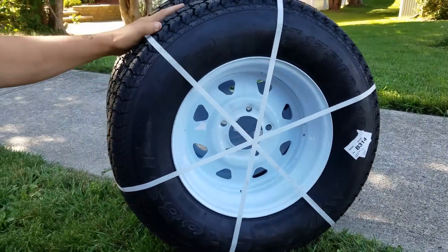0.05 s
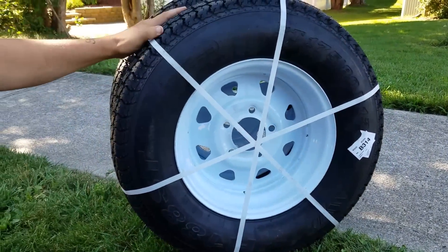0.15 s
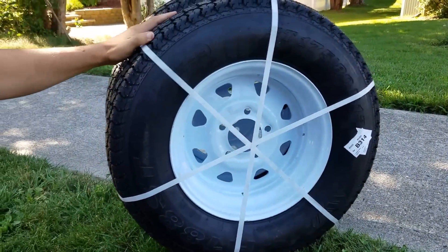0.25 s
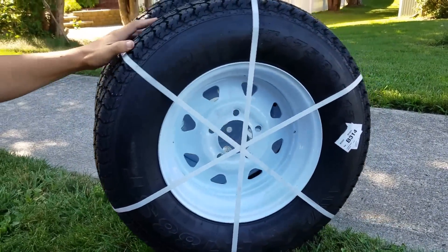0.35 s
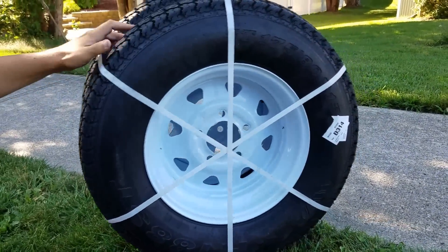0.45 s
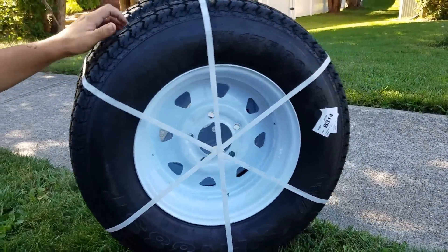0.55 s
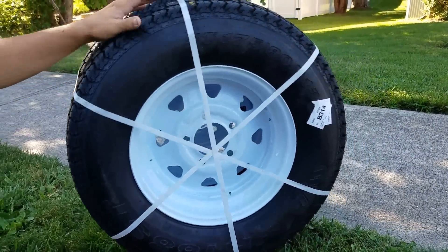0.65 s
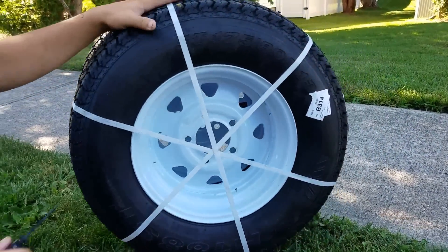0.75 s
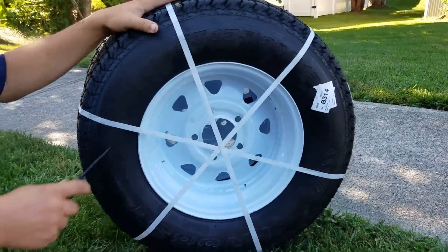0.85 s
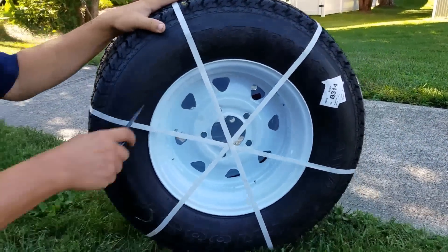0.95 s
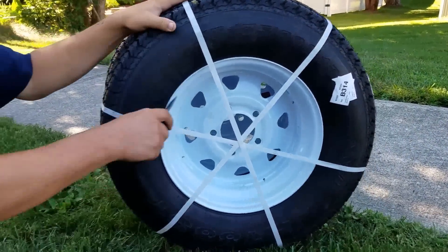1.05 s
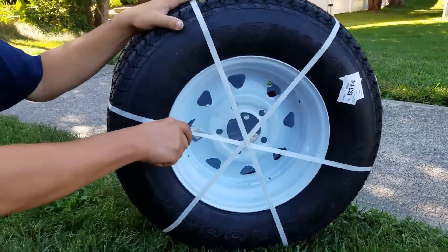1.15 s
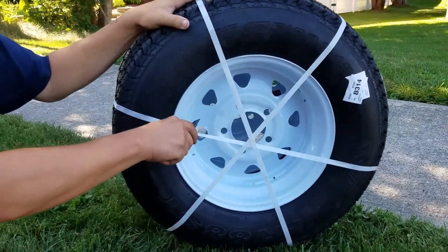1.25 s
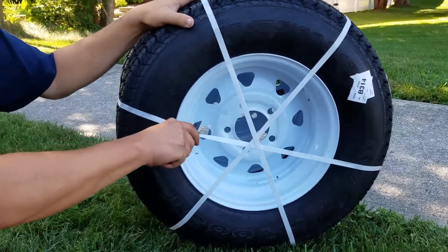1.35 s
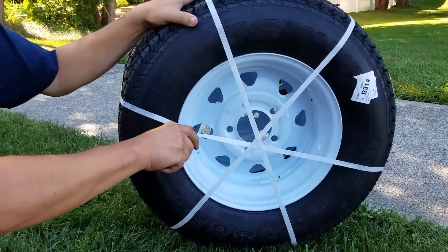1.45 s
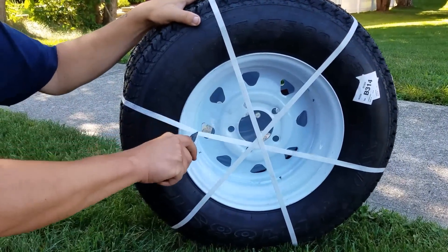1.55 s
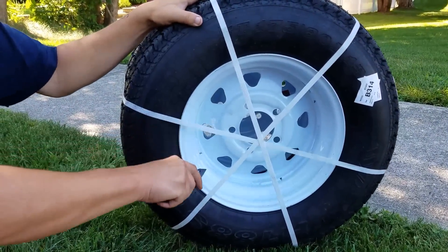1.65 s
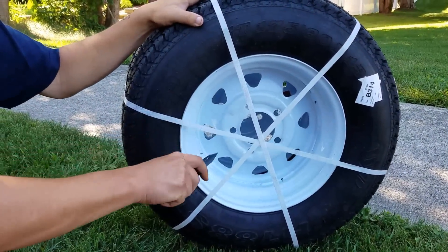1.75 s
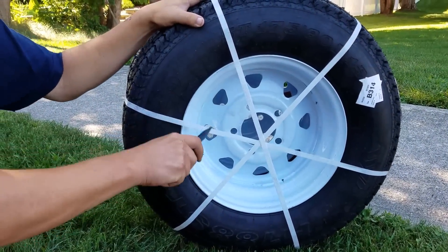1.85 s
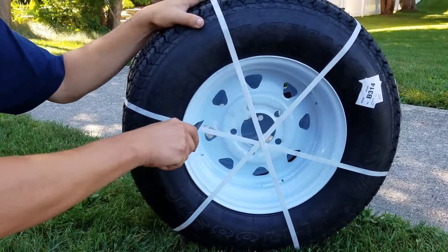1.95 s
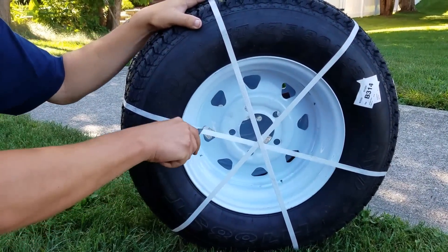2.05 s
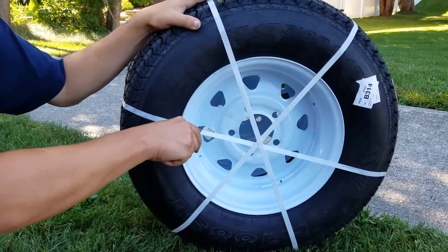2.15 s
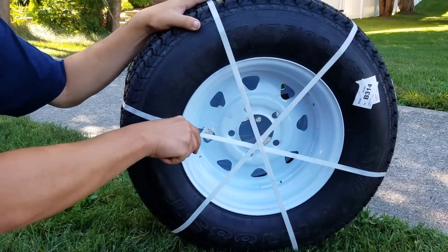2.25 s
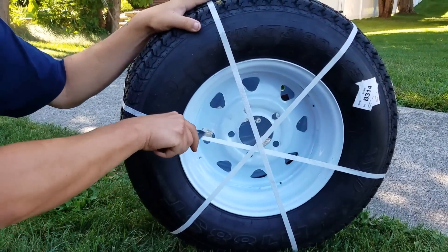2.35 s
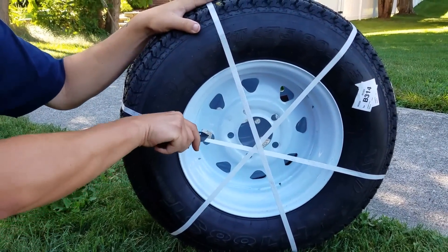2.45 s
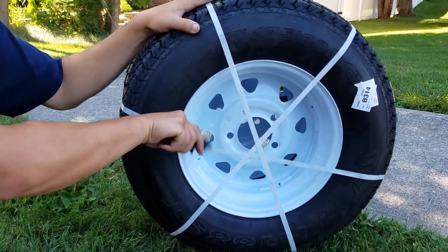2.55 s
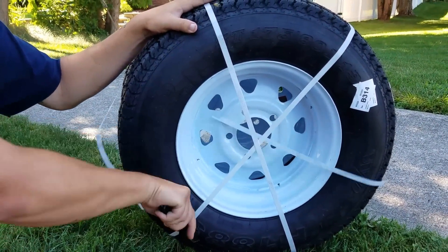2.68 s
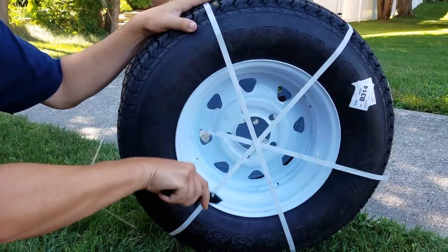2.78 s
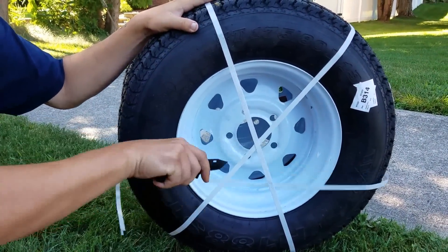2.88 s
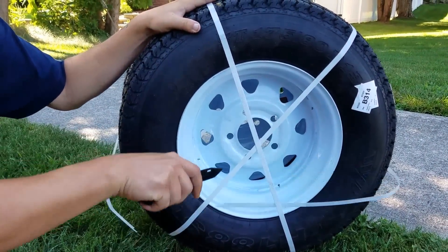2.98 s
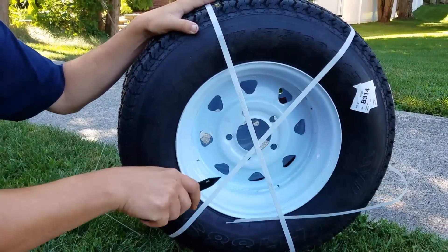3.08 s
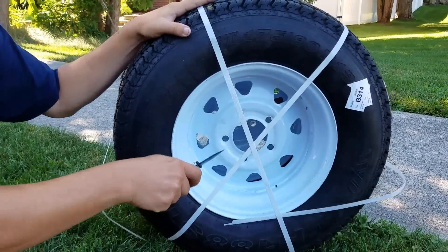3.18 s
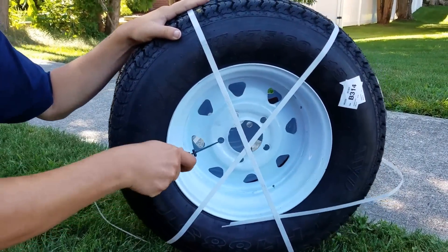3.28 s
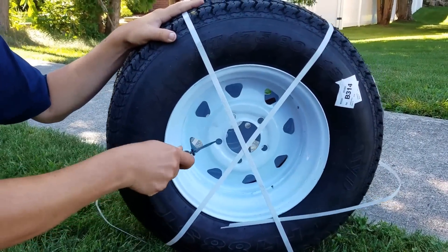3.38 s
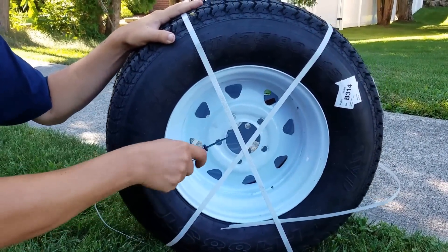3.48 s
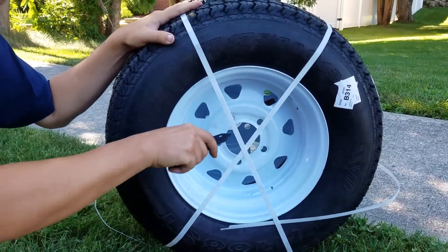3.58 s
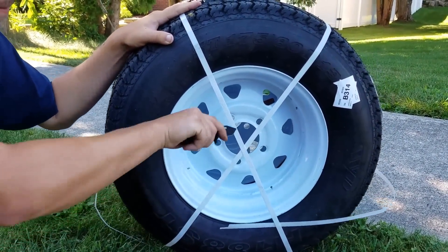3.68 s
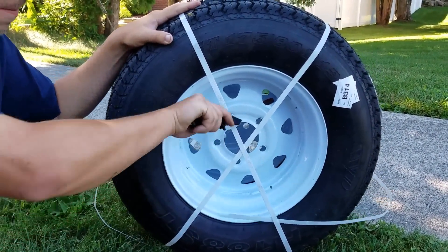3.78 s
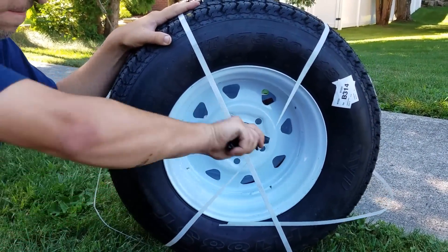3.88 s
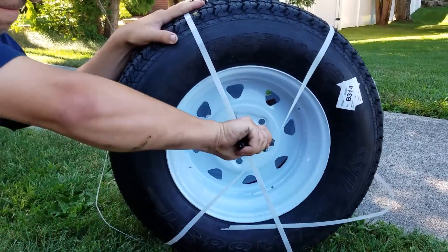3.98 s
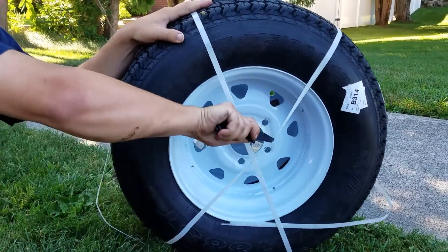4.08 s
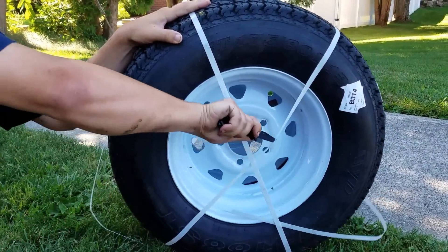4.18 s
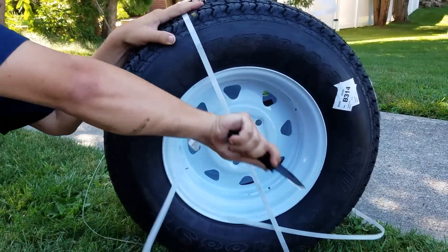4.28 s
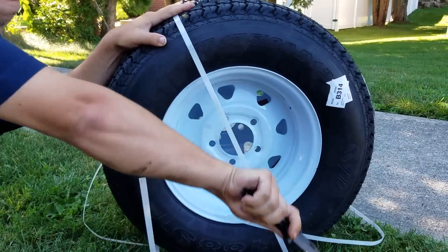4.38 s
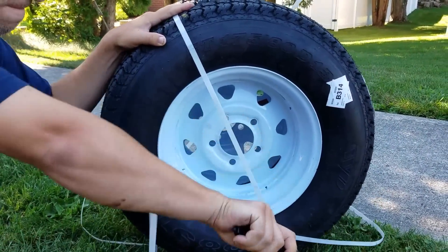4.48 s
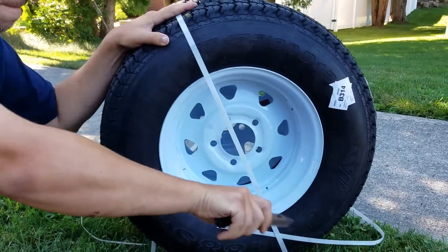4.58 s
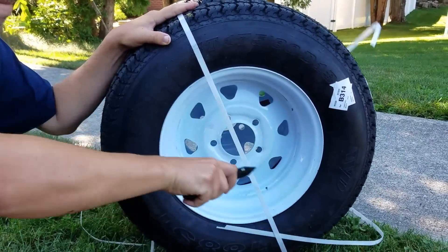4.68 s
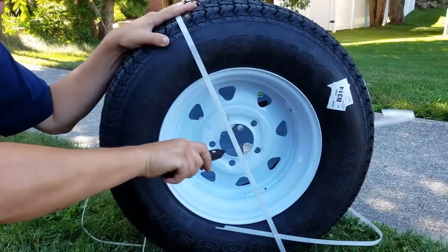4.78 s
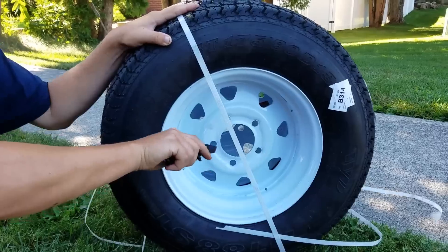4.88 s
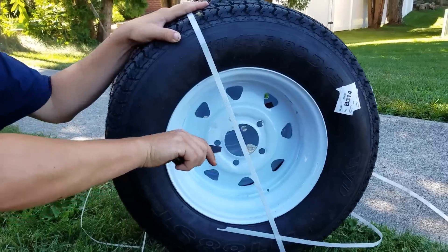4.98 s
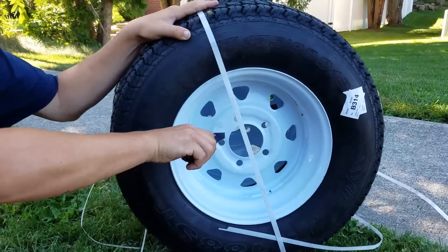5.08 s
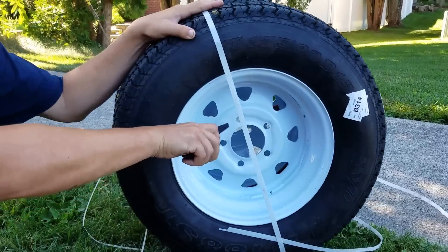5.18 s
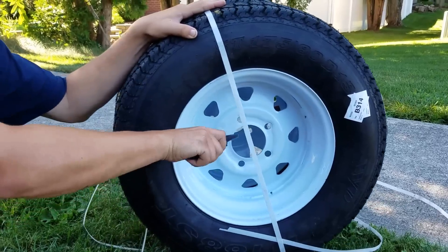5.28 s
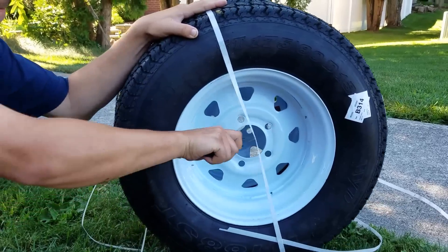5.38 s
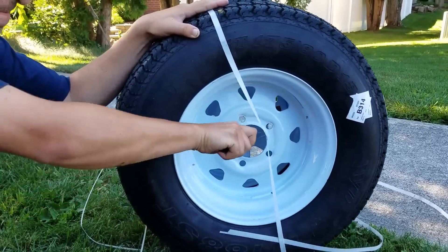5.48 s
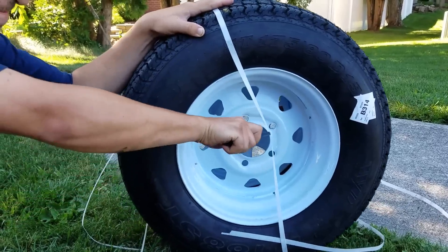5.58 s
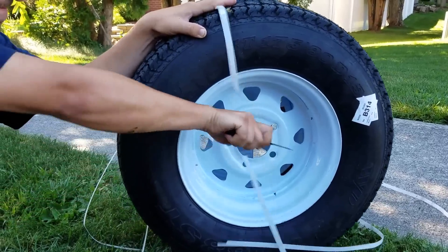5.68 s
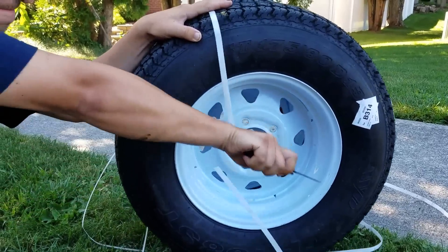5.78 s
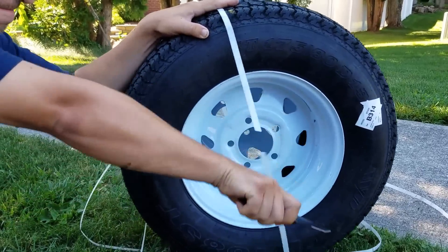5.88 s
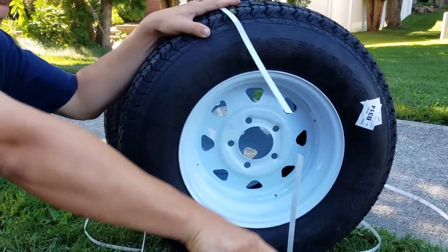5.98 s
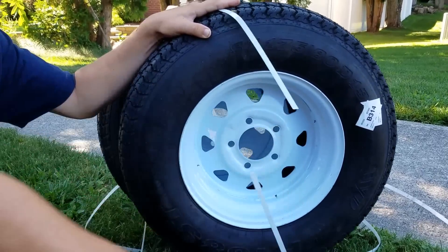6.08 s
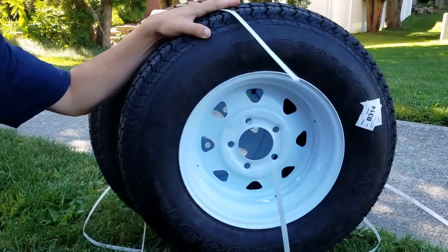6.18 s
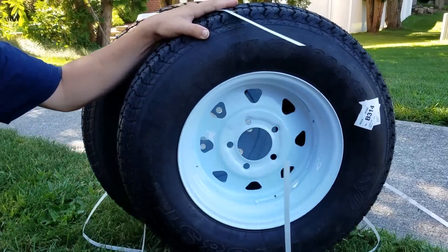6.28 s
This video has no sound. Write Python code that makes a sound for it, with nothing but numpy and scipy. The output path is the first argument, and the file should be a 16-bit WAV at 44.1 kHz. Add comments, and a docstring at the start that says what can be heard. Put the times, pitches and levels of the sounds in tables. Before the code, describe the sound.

Sharp snaps of cut plastic strapping with hollow rubber thumps and brief rim rings, between faint blade ticks and scrapes outdoors.

```python
"""On a lawn, a knife cuts taut plastic packing straps on a trailer wheel: each cut cracks and a tyre mode booms.
Freed ends whip onto the rubber and the steel rim: shaped noise bursts with a twang, plus decaying modes.
Plastic snaps, blade ticks and scrapes are shorter or softer grains of noise, with a weak diffuse echo.
A far engine of two harmonics and faint coloured noise lie underneath; very loud cracks pull the level down
for a moment."""
import sys
import numpy as np
from scipy import signal
from scipy.fft import rfft, irfft, next_fast_len
from scipy.io import wavfile
from scipy.ndimage import uniform_filter1d, minimum_filter1d, map_coordinates

SR = 44100
rng = np.random.default_rng(int(sys.argv[2]) if len(sys.argv) > 2 else 0)


def wav_record(signal):
    """Record a signal, one row per channel, as 16-bit PCM in the file named by sys.argv[1]."""
    frames = np.transpose(np.atleast_2d(signal))
    bounded = np.clip(frames, -1, 1)
    # unit amplitude maps onto the largest positive 16-bit level
    quanta = np.round(bounded * 32767).astype(np.int16)
    wavfile.write(sys.argv[1], SR, quanta)


N = 279726
T = np.arange(SR // 2) / SR  # time inside one event, s
TOP_HZ = 14800  # upper band limit

# knife cuts in a taut strap: [t/s, knock level/dB, tear level/dB, strap resonance f/Hz, nominal t60/s]
CUTS = [(1.194, -46.5, -54.5, 790, 0.073), (1.4228, -25, -43, 673, 0.05), (1.582, -24, -32.5, 751, .11),
        (2.6193, -19, -27, 927, 0.09), (2.636, -23.5, -29.5, 804, 0.062), (3.909, -31, -37.5, 848, .135),
        (4.2574, -29, -34.5, 558, .07), (4.2869, -26.5, -40, 1400, 0.039), (5.683, -17, -27.5, 891, 0.068)]
# freed ends landing on the wheel: [t/s, slither duration/s, strap level/dB, splinter level/dB, strap f/Hz,
# nominal t60/s, tyre level/dB, favoured tyre f/Hz, rim level/dB, favoured rim f/Hz]
WHIPS = [(1.6381, .005, -26, -26.5, 528, .15, -24, 208, -44, 1500),
         (2.689, .009, -27.5, -31.5, 870, 0.13, -28.5, 440, -59, 1200),
         (4.3115, .002, -19, -43, 1144, .095, -15.5, 260, -36.5, 2127),
         (5.7326, .009, -9.3, -24.5, 990, 0.061, -15.5, 270, -25, 1040)]
# modes of tyre and wheel disc: [f/Hz, relative level/dB, t60/s]
TYRE_MODES = [(95, -9.5, 0.24), (181.3, -3, .18), (208.5, -1, 0.22), (332.5, 1, 0.14), (387, -9, 0.24),
              (451.6, 0, 0.17), (580, 1.5, 0.046), (673, 2, 0.25)]
# modes of the steel rim: [f/Hz, relative level/dB, t60/s]
RIM_MODES = [(1021, 13, 0.066), (1230, 3, 0.052), (1403, 7, 0.13), (1440, -14.5, 0.5), (1501, -10, 0.15),
             (1557, -2, .18), (1960, -2.5, 0.21), (2054, 0.5, 0.14), (2185, 2, 0.21), (2220, -2, .26),
             (2290, -1, 0.28), (2540, -8, 0.36), (2720, -14.5, 0.6), (2880, -11, 0.7), (3134, -16, 0.45),
             (3164, -16.5, 0.3)]
# snaps of brittle plastic: [t/s, level/dB, left-right level difference/dB]
SNAPS = [(1.638, -16.5, -8), (2.121, -51, -1), (2.192, -46, 0), (2.426, -42, 0), (2.6233, -14, -2),
         (2.688, -23.5, -6), (2.728, -27.5, -5), (2.852, -39, -1), (4.26, -18.5, -3.5), (4.2875, -11.5, -3),
         (4.3101, -2, -4), (5.7336, -9.5, 0)]
# light ticks of the blade on steel: [t/s, level/dB]
TICKS = [(2.971, -47.5), (4.016, -53), (4.9396, -35), (4.9452, -27.5), (4.956, -40), (4.983, -36),
         (5.046, -47), (5.067, -45.5), (5.429, -44), (5.778, -30.5)]
# sliding of blade, straps and hand: [t/s of the peak, half length/s, body level/dB, hiss level/dB]
SCRAPES = [(.03, .05, -57.5, -68), (.768, 0.048, -52, -54), (2.173, 0.047, -54.5, -71),
           (2.197, .009, -43.5, -54.5), (2.443, 0.015, -41, -51.5), (2.571, .008, -40.5, -64),
           (2.86, 0.016, -51, -61), (3.048, 0.19, -66, -71), (4.086, .045, -49, -57.5),
           (5.445, .02, -49, -62), (5.528, 0.0034, -56, -64), (6.297, 0.0077, -47, -65)]
# spectrum of a tearing strap: [f/Hz, relative spectral level/dB]
STRAP_COLOUR = [(41, -45.5), (70, -18), (198, -6), (272, -9), (457, -1), (585, -2.5), (670, -0.5),
                (1380, 1.5), (1690, -5.5), (2660, -4.5), (3570, -17), (7190, -23), (12600, -14),
                (14500, -13.5), (15500, -38.5)]
# spectrum of snapping plastic: [f/Hz, relative spectral level/dB]
SNAP_COLOUR = [(300, -10), (700, -4), (1150, -1), (2100, -7), (3100, -8), (4200, -21), (5200, -14),
               (7500, -17), (9200, -2), (10800, -8.5), (12600, 3), (14500, 1.5)]
# stereo balance of the near sources: [f/Hz, left-right level difference/dB]
NEAR_PAN = [(200, -1.5), (700, -2.5), (1200, -5), (2200, -10.5), (3200, -11), (4500, -3.5), (6500, 6),
            (9000, -5.5), (14000, 2.5)]
# stereo likeness of the near sources: [f/Hz, left-right correlation]
NEAR_ALIKE = [(300, 0.98), (1000, .94), (2500, 0.13), (4500, 0.19), (12000, 0.04)]
# decay of the answer from the yard: [f/Hz, t60/s]
YARD_DECAY = [(150, .34), (700, 0.3), (2500, 0.28), (6000, 0.38), (13000, 0.16)]
# far engine: [t/s, mean pitch f/Hz, level/dB]
ENGINE = [(0, 100.3, -73), (.6, 96.5, -56.5), (1.9, 88.3, -61), (2.5, 60.2, -63.5), (4.1, 64.4, -57),
          (4.5, 65.7, -67.5), (6.34, 66, -77)]
# spectrum of the open air: [f/Hz, relative spectral level/dB]
AIR_COLOUR = [(15, -44.5), (25, -29), (27, -22), (45, -16.5), (98, 1), (250, -8), (373, -13.5), (415, -16),
              (515, -20.5), (2130, -28), (5720, -45.5), (7680, -37.5), (10000, -47.5), (13800, -38),
              (15000, -47.5)]
# stereo balance of the air: [f/Hz, left-right level difference/dB]
AIR_PAN = [(60, -5.5), (150, -2.5), (380, -2.0), (950, -3), (2380, -6), (5980, 2), (15000, 0)]
# stereo likeness of the air: [f/Hz, left-right correlation]
AIR_ALIKE = [(60, 0.97), (180, 0.99), (550, 0.35), (1650, -0.16), (4970, -0.14), (15000, 0.0055)]
# slow swell of the air: [t/s, rumble level/dB, hush level/dB]
AIR_LEVEL = [(0, -55.5, -58.5), (.8, -55, -57.5), (2.7, -54, -58), (3.3, -54.5, -59), (6.34, -54, -57.5)]

RISE_SHARE = 0.045  # rise time of a cut over its t60
THUD_DB, BOOM_DB = -0.5, -3.5  # thud and tyre boom relative to the tear
BOOM_HZ, BOOM_LAG_S = 282, .005  # tyre pitch that a cut favours, and its delay
SLITHER_DB, SLITHER_HISS_DB, SLITHER_HZ, SLITHER_T60_S = -28, -29, 1830, 0.04  # sliding in before landing
WHIP_THUD_DB = -8  # relative to the tyre boom
# loose ends land again after a whip
PATTER_DB, PATTER_FROM_S, PATTER_SPAN_S, PATTER_FALL_DB_PER_S = -31, .03, 0.039, 80
SNAP_HZ, SNAP_BODY_DB = 1450, -8  # pitch of a snap; its body relative to its edge
TICK_HZ, TICK_EDGE_DB = 3700, -2.5  # pitch of a tick; its edge relative to its body
ROUGH_DB, CATCHES_PER_S = 1.75, 100  # how unevenly sliding plastic catches
# level dip: onset, dB of cut per dB above it, deepest cut
DIP_THRESHOLD_DB, DIP_SLOPE, DIP_MOST_DB = -13.5, 3, 5.5
DIP_ATTACK_S, DIP_HOLD_S, DIP_RELEASE_DB_PER_S = 0.00099, 0.58, 15.5


def cuts():
    """Release of stored tension: the stronger the tear, the harder the tyre springs back."""
    out = np.zeros((2, N))
    for s, knock_db, tear_db, strap_hz, t60 in CUTS:
        add(out, s, crack(knock_db, tear_db, tear_db + THUD_DB, strap_hz, RISE_SHARE * t60, t60))
        add(out, s + BOOM_LAG_S, tyre(tear_db + BOOM_DB, BOOM_HZ))
    return out


def whips():
    """Impact excitation: the freed end slithers in, strikes tyre and rim, then patters ever more weakly."""
    out = np.zeros((2, N))
    for (s, slither_s, strap_db, splinter_db, strap_hz, t60,
         tyre_db, tyre_hz, rim_db, rim_hz) in WHIPS:
        slither = crack(SLITHER_DB, SLITHER_HISS_DB, -np.inf, SLITHER_HZ, slither_s, SLITHER_T60_S)
        add(out, s - slither_s, slither)
        add(out, s, crack(strap_db, splinter_db, tyre_db + WHIP_THUD_DB, strap_hz, 0.015 * t60, t60))
        add(out, s + 0.00205, tyre(tyre_db, tyre_hz) + rim(rim_db, rim_hz))
        for delay in PATTER_FROM_S + PATTER_SPAN_S * rng.random(size=3):
            db = PATTER_DB - PATTER_FALL_DB_PER_S * delay
            add(out, s + delay, click(db + SNAP_BODY_DB, db, SNAP_HZ, pan_db=-2.5))
    return out


def crack(body_db, splinter_db, thud_db, ring_hz, rise, t60):
    """Brittle fracture: fibres splinter in a volley, the free strap twangs and a slower rubber thud follows."""
    uneven = ripple(depth_db=3, count=90)

    def colour(hz):
        resonance_db = 3.9 * bump(hz, ring_hz, octaves=0.15)
        return amp(along(STRAP_COLOUR, hz) + along(uneven, hz) + resonance_db)

    thud_shape = strike(rise + 0.0055, t60, first=0)
    thud = burst(thud_shape, lambda hz: colour(hz) * band(hz, 0), grain_db=-1.0)
    body = burst(strike(rise, 1.013 * t60), lambda hz: colour(hz) * band(hz, 1), grain_db=2.5)
    splinter_shape = strike(0.88 * rise, 0.98 * t60)
    splinter = burst(splinter_shape, lambda hz: colour(hz) * band(hz, 2), grain_db=4.5)

    outline = strike(rise, 0.84 * t60, first=0)
    size = len(outline)
    cycles = ring_hz * T[:size] + rng.random() + 0.12 * wobble(size, rate=170)
    twang = amp(-3.5) * outline * np.sin(2 * np.pi * cycles) * sides(along(NEAR_PAN, ring_hz))
    mix = amp(thud_db) * thud + amp(body_db) * (body + twang) + amp(splinter_db) * splinter
    return bend(mix, lag=0.002523)


def ripple(depth_db, count):
    """Irregular resonance of one free length of strap, as (f/Hz, level/dB) points."""
    hz = np.linspace(np.sqrt(200), np.sqrt(TOP_HZ), count) ** 2
    return np.column_stack([hz, depth_db * rng.standard_normal(count)])


def bend(x, lag):
    """Dispersion of bending waves: a delay of lag * (sqrt(1000 / f) - 1/3) makes a crack chirp down."""
    return filtered(x, lambda hz: np.exp(-2j * np.pi * lag * (2 * np.sqrt(1000 * hz) - hz / 3)))


def tyre(db, spot_hz):
    """Modal excitation of the tyre: the spot that is hit favours modes near its pitch."""
    weight = lambda hz: 0.24 + 0.51 * bump(hz, spot_hz, octaves=0.31)
    return amp(db) * ring(TYRE_MODES, attack=0.0046, weight=weight, spread=.08)


def rim(db, spot_hz):
    """Modal ringing of steel, amplitude-modulated as the loose strap rattles against it."""
    rattle = amp(3 * wobble(len(T), rate=110))
    weight = lambda hz: 0.48 + bump(hz, spot_hz, octaves=0.23)
    return amp(db) * rattle * ring(RIM_MODES, attack=0.00097, weight=weight, spread=.45)


def ring(modes, attack, weight, spread):
    """Modal superposition: decaying sines, each at a new strength and with its own phase at either ear."""
    out = np.zeros((2, len(T)))
    for hz, db, t60 in modes:
        phase = rng.uniform(0, 2 * np.pi) + spread * rng.standard_normal((2, 1))
        fall = amp(-60 * T / t60)
        strength = amp(db + rng.normal(0, 1.38)) * weight(hz)
        out += strength * sides(along(NEAR_PAN, hz)) * fall * np.sin(2 * np.pi * hz * T + phase)
    return out * (1 - np.exp(-T / attack))


def contacts():
    """Contact impulses: plastic snaps are nearly all edge, blade ticks on steel are higher and rounder."""
    out = np.zeros((2, N))
    for s, db, pan_db in SNAPS:
        add(out, s, click(db + SNAP_BODY_DB, db, SNAP_HZ, pan_db))
    for s, db in TICKS:
        add(out, s, click(db, db + TICK_EDGE_DB, TICK_HZ, pan_db=-2.5))
    return out


def click(body_db, edge_db, ring_hz, pan_db):
    """Short impact of a hard edge: a few milliseconds of noise around the pitch of the struck part."""
    colour = lambda hz: amp(along(SNAP_COLOUR, hz) + 25 * bump(hz, ring_hz, octaves=0.71))
    body = burst(strike(0.00063, 0.019), lambda hz: colour(hz) * band(hz, 1), grain_db=1.5)
    edge = burst(strike(0.00086, 0.015), lambda hz: colour(hz) * band(hz, 2), grain_db=3.5)
    return bend(amp(body_db) * body + amp(edge_db) * edge * sides(pan_db), lag=0.000884)


def scrapes():
    """Stick-slip friction: sliding plastic catches and slips in a soft swell of grains."""
    out = np.zeros((2, N))
    middle = T.mean()
    for s, half, body_db, hiss_db in SCRAPES:
        catches = amp(ROUGH_DB * wobble(len(T), rate=CATCHES_PER_S))
        swell = np.exp(-((T - middle) / half) ** 2) * catches
        body = burst(swell, lambda hz: amp(along(SNAP_COLOUR, hz)) * band(hz, 1), grain_db=1.5)
        hiss = burst(swell, lambda hz: amp(along(STRAP_COLOUR, hz)) * band(hz, 2), grain_db=2.5)
        add(out, s - middle, amp(body_db) * body + amp(hiss_db) * hiss)
    return out


def yard(x):
    """Diffuse reflection from ground, fence and house: convolution with noise decaying by frequency."""
    hz, t, z = signal.stft(rng.standard_normal((2, SR // 2)), SR, nperseg=256)
    decay = amp(-60 * t / along(YARD_DECAY, hz)[:, None])
    tail = signal.istft(z * decay, SR, nperseg=256)[1]
    tail *= 1 - np.exp(-np.arange(tail.shape[1]) / SR / 0.0051)  # soft onset
    return signal.fftconvolve(x, tail / np.linalg.norm(tail[0]), axes=1)[:, :N]


def outdoors():
    """Broadband ambience plus a harmonic source: rumble, hush, thin high hiss and an engine that slows."""
    rumble_db, hush_db = curves(AIR_LEVEL)
    air = lambda colour: noise(N, colour, AIR_PAN, AIR_ALIKE)
    rumble = amp(rumble_db) * air(lambda hz: amp(along(AIR_COLOUR, hz)) / np.hypot(1, (hz / 450) ** 5))
    hush = amp(hush_db) * air(lambda hz: amp(along(AIR_COLOUR, hz)) * (band(hz, 1) + band(hz, 2)))
    hiss = amp(hush_db - 20) * air(lambda hz: bump(hz, 7800, octaves=.05))

    pitch_hz, engine_db = curves(ENGINE)
    unsteady_hz = pitch_hz * (1 + .012 * wobble(N, rate=16))
    turn = 2 * np.pi * np.cumsum(unsteady_hz) / SR
    engine = amp(engine_db + 2.3 * wobble(N, rate=35)) * (np.sin(turn) + 0.43 * np.sin(2 * turn))
    return rumble + hush + hiss + engine * sides(3.5)


def burst(shape, colour, grain_db):
    """Granular noise: near noise with the outline and energy of shape."""
    size = len(shape)
    grains = amp(np.minimum(grain_db, 4.5) * wobble(size, rate=900))
    x = noise(size, colour, NEAR_PAN, NEAR_ALIKE) * shape * grains
    return unit(x) * np.sqrt(np.mean(shape ** 2))


def strike(rise, t60, first=0.45):
    """Impulsive envelope: a start at first, a straight rise and an exponential fall."""
    t = T[:SR // 5]
    onset = np.minimum(first + t / max(rise, 1e-4) * (1 - first), 1)
    return onset * amp(-60 * np.maximum(t - rise, 0) / t60)


def noise(size, colour, pan, alike):
    """Partial coherence: stereo noise of rms 1 with colour, balance and correlation set by frequency."""
    turn = lambda hz: np.arccos(np.clip(along(alike, hz), -1, 1)) / 2
    mid_side = lambda hz: colour(hz) * np.array([np.cos(turn(hz)), np.sin(turn(hz))])
    mid, side = filtered(rng.standard_normal((2, size)), mid_side)
    stereo = np.array([mid + side, mid - side])
    return unit(filtered(stereo, lambda hz: sides(along(pan, hz))))


def wobble(size, rate):
    """Band-limited fluctuation: a smooth random curve with rate knots a second."""
    knots = rng.standard_normal(int(size * rate / SR) + 4)
    return map_coordinates(knots, [np.arange(size) * rate / SR])


def band(hz, index):
    """Band-pass magnitude: soft-edged bass (0), middle (1) or treble (2)."""
    lo, hi = [(70, 450), (450, 3500), (3500, 15000)][index]
    return ((1 + (lo / (hz + 1)) ** 10) * (1 + (hz / hi) ** 10)) ** -.5


def bump(hz, centre_hz, octaves):
    """Resonance bell of height 1 on a logarithmic frequency axis."""
    return np.exp(-.5 * (np.log2((hz + 1) / centre_hz) / octaves) ** 2)


def sides(db):
    """Interaural level difference: left and right gains with a mean square of 1."""
    g = amp(np.array([db, -db]).reshape(2, -1) / 2)
    return g / np.sqrt(np.mean(g ** 2, axis=0))


def filtered(x, response):
    """Linear filtering: the spectrum of x times a response of frequency."""
    n = x.shape[-1]
    m = next_fast_len(n + SR // 8)
    return irfft(rfft(x, m) * response(np.fft.rfftfreq(m, 1 / SR)), m)[..., :n]


def along(points, hz):
    """Interpolation of (f/Hz, value) points on a logarithmic frequency axis."""
    f, v = np.transpose(points)
    return np.interp(np.log(hz + 1), np.log(f + 1), v)


def curves(rows):
    """Interpolation in time: one value per sample for each column after t/s."""
    s, *cols = np.transpose(rows)
    return [np.interp(np.arange(N) / SR, s, c) for c in cols]


def add(track, s, x):
    """Superposition: mix x into track from time s."""
    start = round(s * SR)
    x = x[:, max(-start, 0):N - start]
    track[:, max(start, 0):][:, :x.shape[1]] += x


def amp(db):
    """Amplitude ratio of a level in dB."""
    return 10 ** (np.asarray(db) / 20)


def unit(x):
    """Normalisation to an rms of 1."""
    return x / np.sqrt(np.mean(x ** 2) + 1e-20)


def level_dip(x):
    """Dynamic compression: a very loud crack lowers the level, which holds there and then creeps back."""
    power = uniform_filter1d(np.max(x ** 2, axis=0), SR // 60)
    over_db = 10 * np.log10(np.abs(power) + 1e-12) - DIP_THRESHOLD_DB
    cut_db = np.clip(DIP_SLOPE * over_db, 0, DIP_MOST_DB)
    hold = int(DIP_HOLD_S * SR)
    held_db = -minimum_filter1d(-cut_db, hold, origin=(hold - 1) // 2)  # running maximum
    creep_db = DIP_RELEASE_DB_PER_S * np.arange(N) / SR
    released_db = np.maximum.accumulate(held_db + creep_db) - creep_db
    keep = np.exp(-1 / (DIP_ATTACK_S * SR))
    return x * amp(-signal.lfilter([1 - keep], [1, -keep], released_db))


def scene():
    """Superposition of close work on the wheel, its answer from the yard, and the open air."""
    near = cuts() + whips() + contacts() + scrapes()
    return near + amp(-15.5) * yard(near) + outdoors()


def record(dry):
    """Compression, clipping at full scale and a steep low-pass at the band limit."""
    clipped = np.clip(level_dip(dry), -1, 1)
    return filtered(clipped, lambda hz: 1 / np.hypot(1, (hz / TOP_HZ) ** 60))


dry = scene()
out = record(dry)
wav_record(out)
```